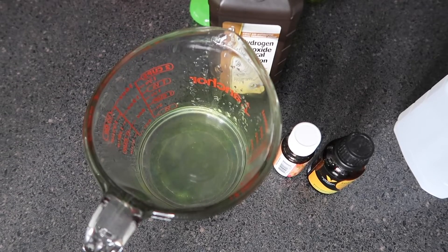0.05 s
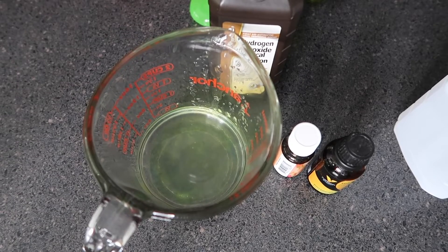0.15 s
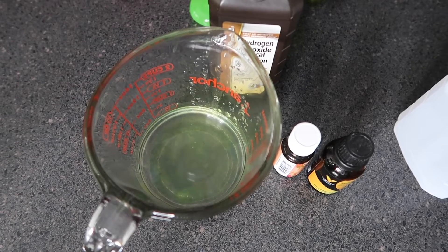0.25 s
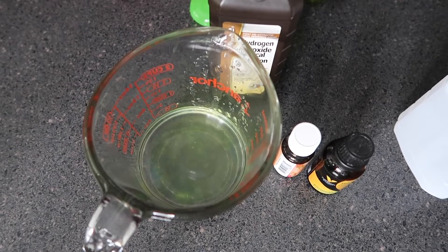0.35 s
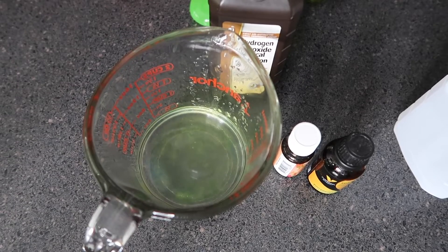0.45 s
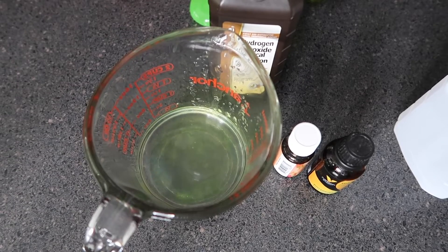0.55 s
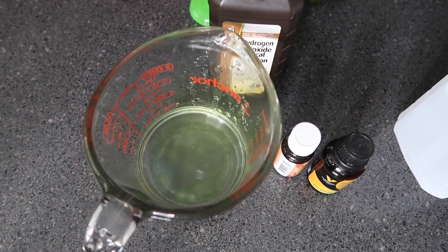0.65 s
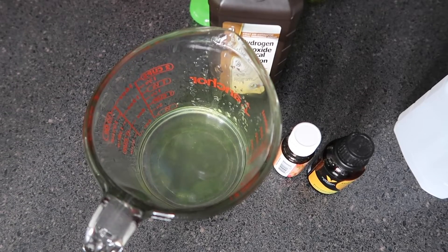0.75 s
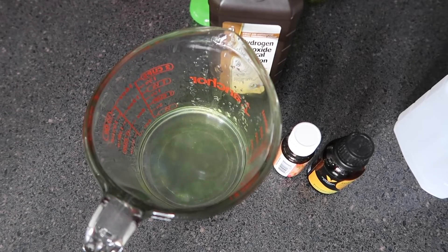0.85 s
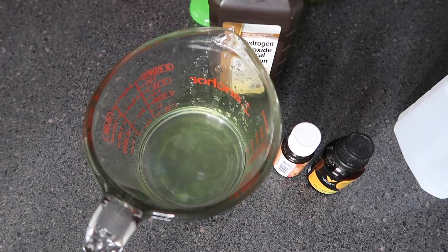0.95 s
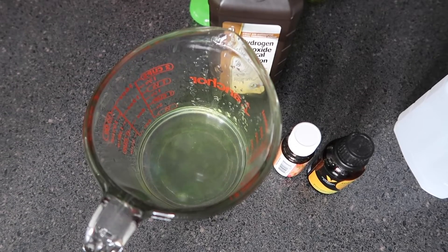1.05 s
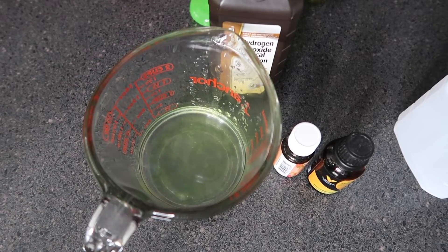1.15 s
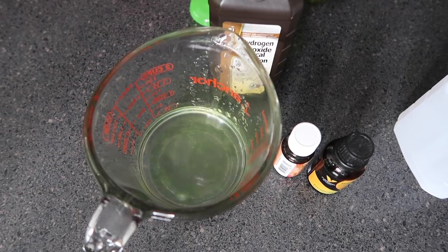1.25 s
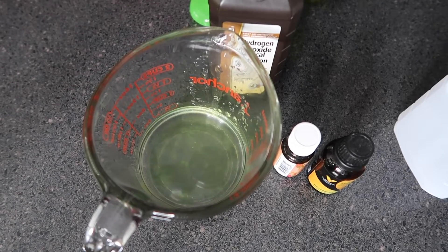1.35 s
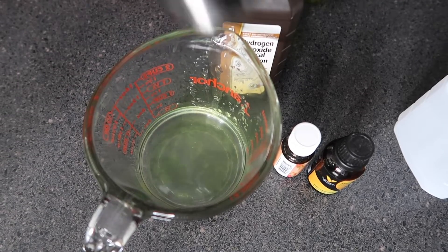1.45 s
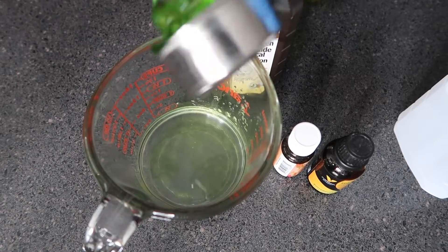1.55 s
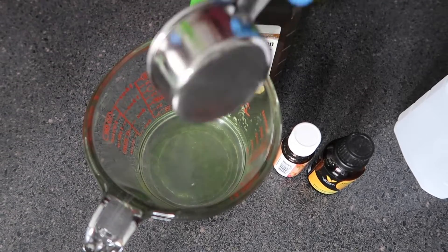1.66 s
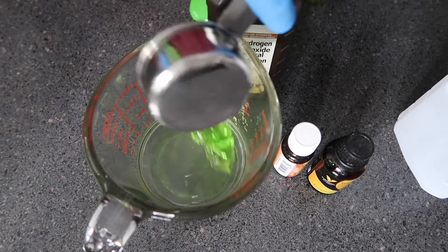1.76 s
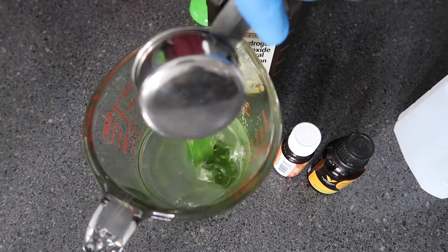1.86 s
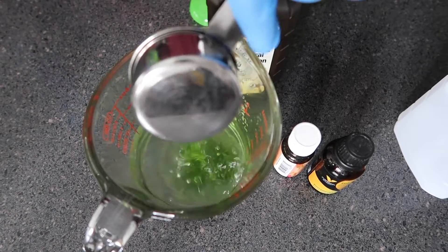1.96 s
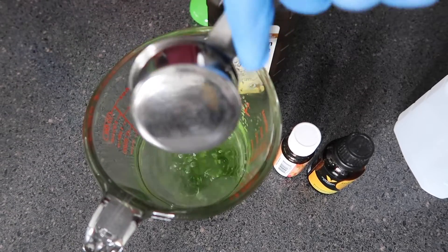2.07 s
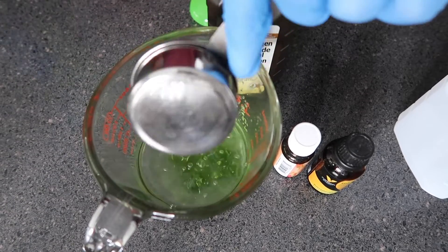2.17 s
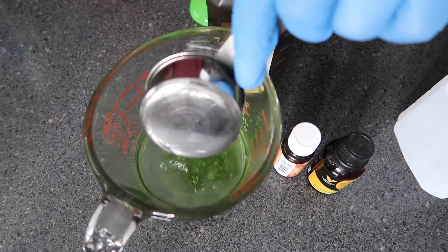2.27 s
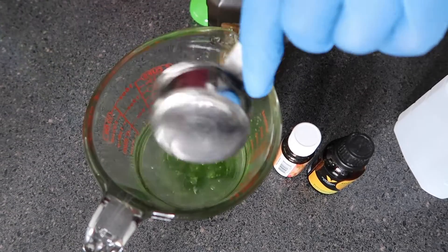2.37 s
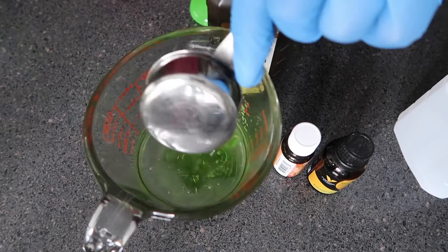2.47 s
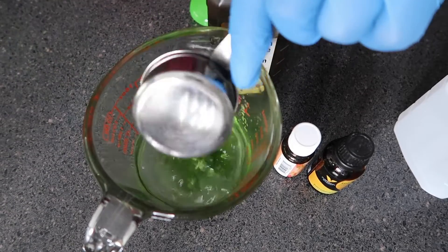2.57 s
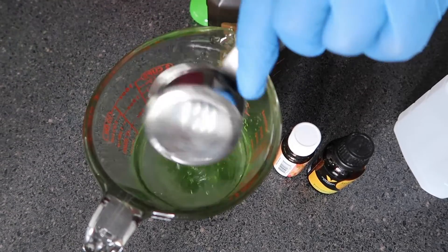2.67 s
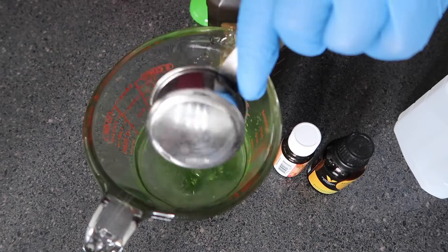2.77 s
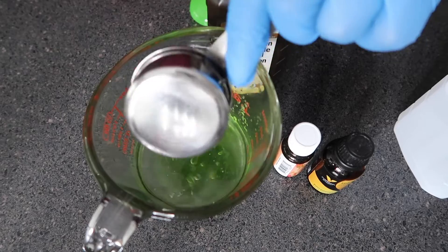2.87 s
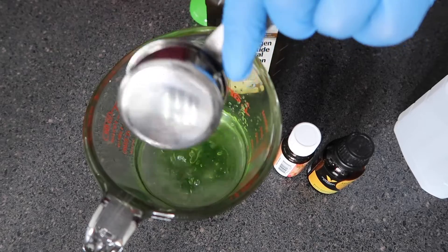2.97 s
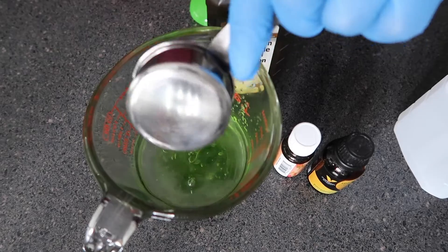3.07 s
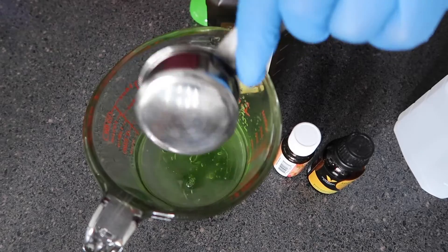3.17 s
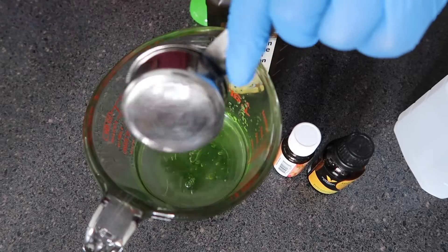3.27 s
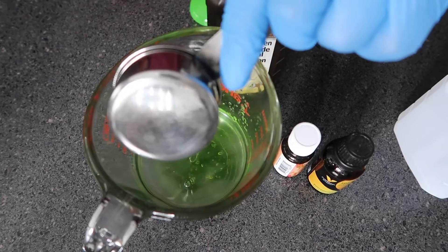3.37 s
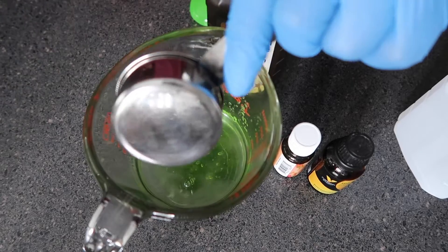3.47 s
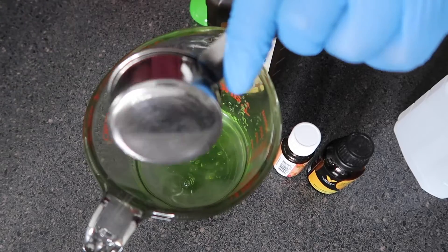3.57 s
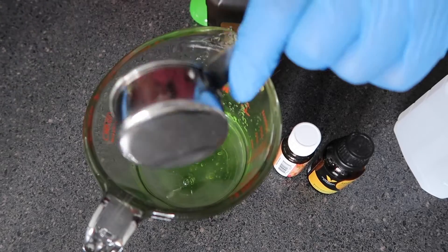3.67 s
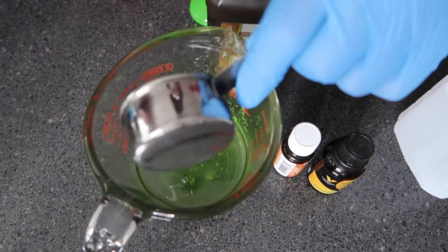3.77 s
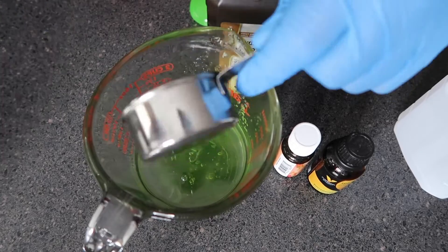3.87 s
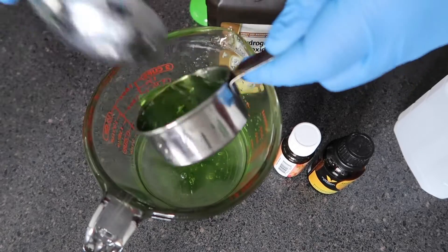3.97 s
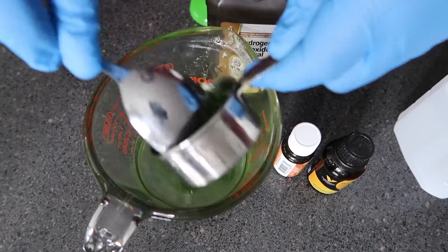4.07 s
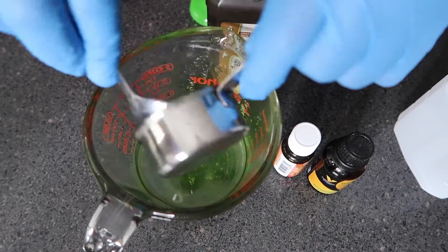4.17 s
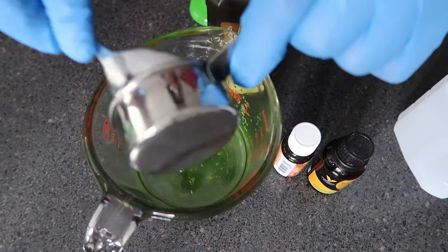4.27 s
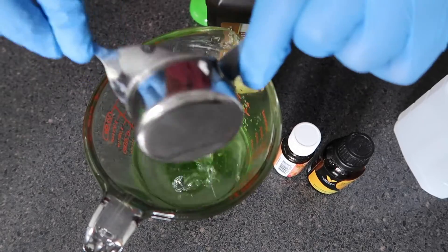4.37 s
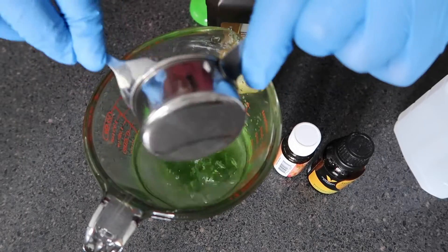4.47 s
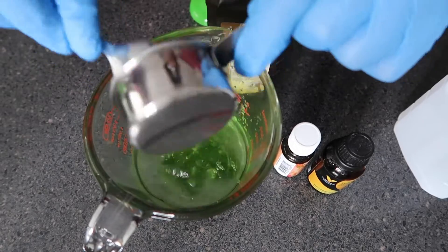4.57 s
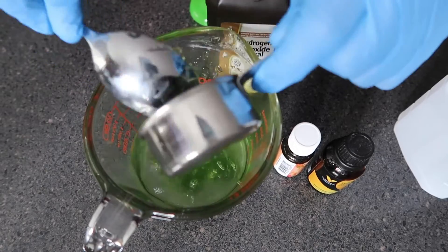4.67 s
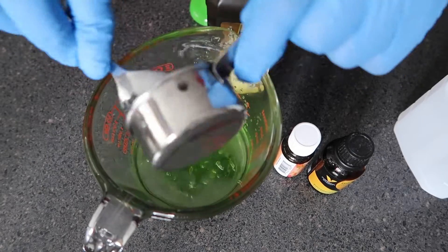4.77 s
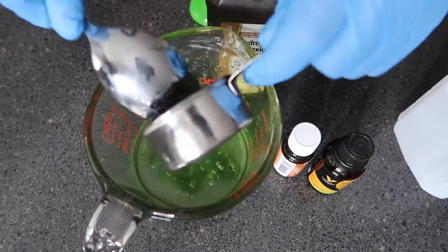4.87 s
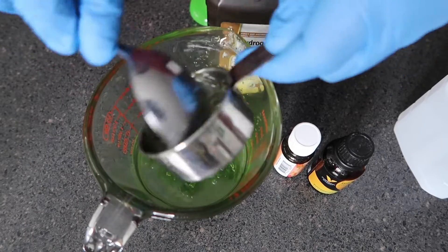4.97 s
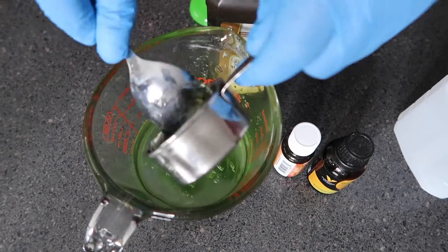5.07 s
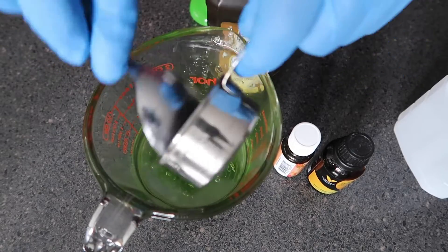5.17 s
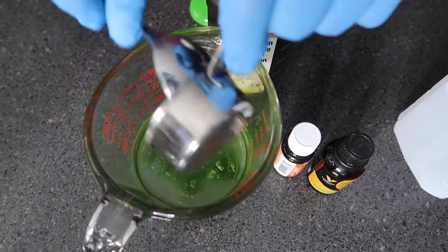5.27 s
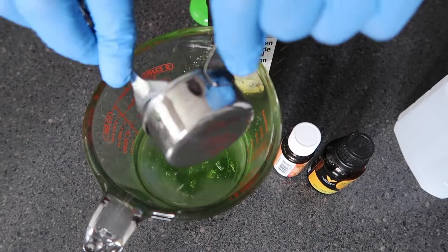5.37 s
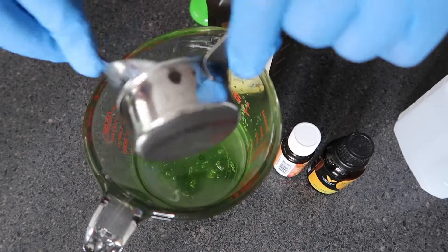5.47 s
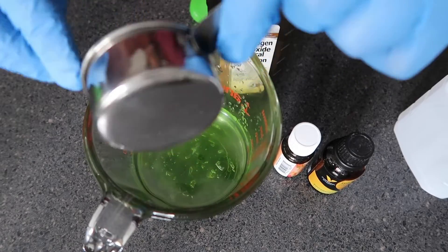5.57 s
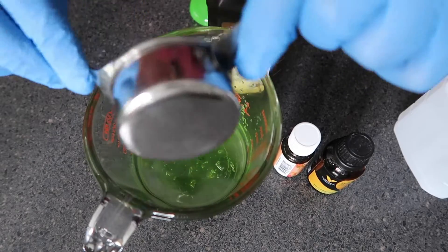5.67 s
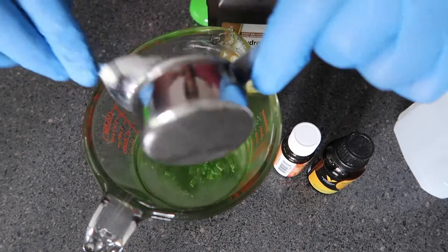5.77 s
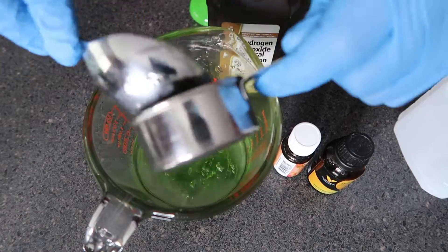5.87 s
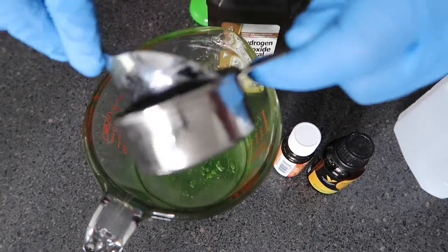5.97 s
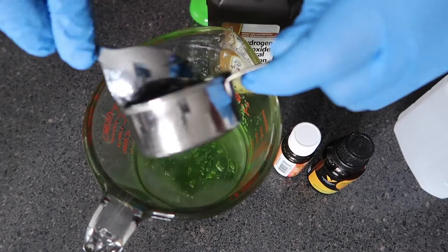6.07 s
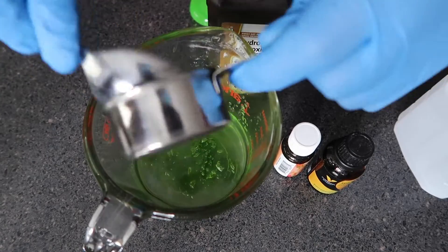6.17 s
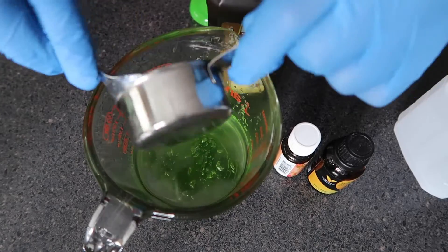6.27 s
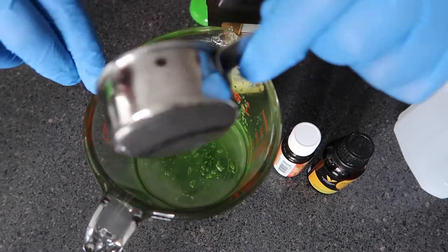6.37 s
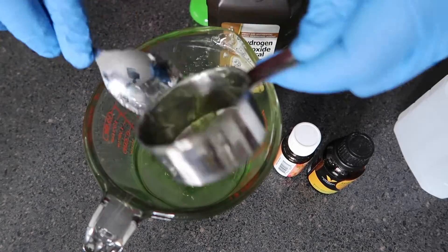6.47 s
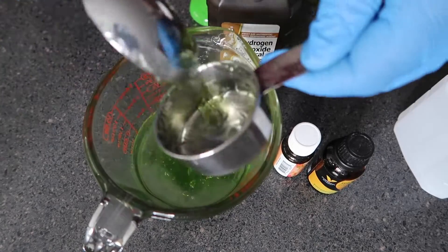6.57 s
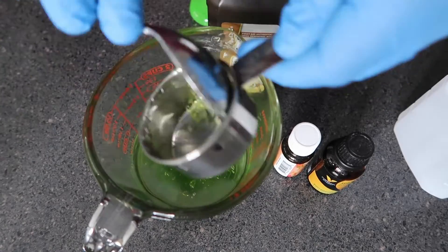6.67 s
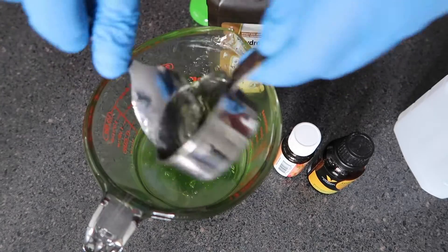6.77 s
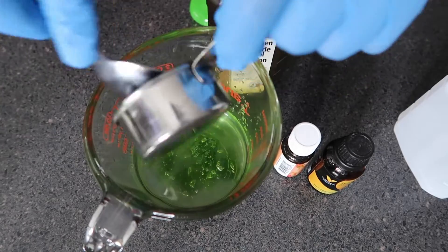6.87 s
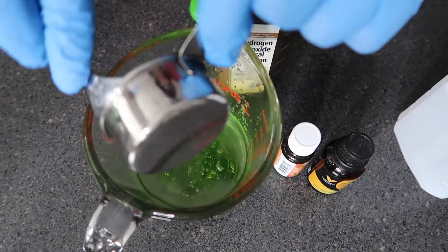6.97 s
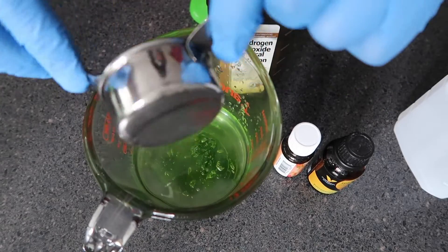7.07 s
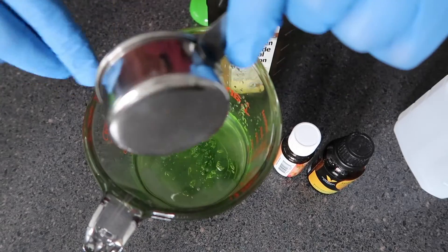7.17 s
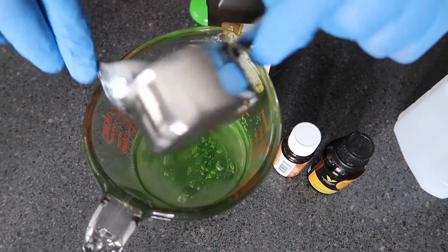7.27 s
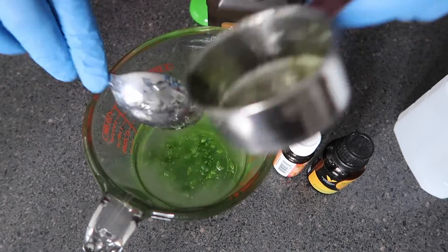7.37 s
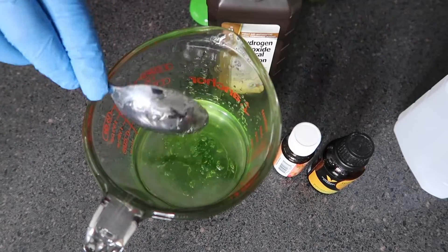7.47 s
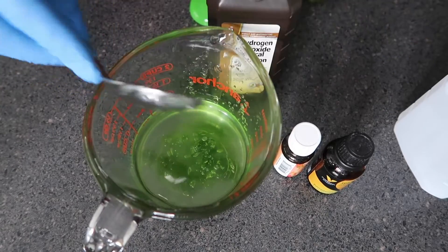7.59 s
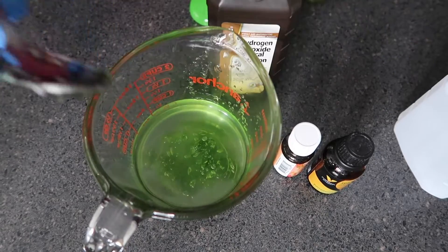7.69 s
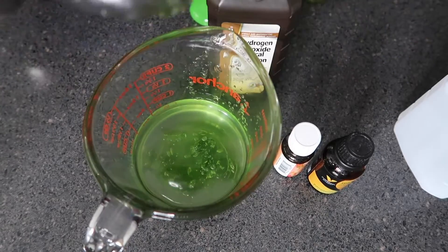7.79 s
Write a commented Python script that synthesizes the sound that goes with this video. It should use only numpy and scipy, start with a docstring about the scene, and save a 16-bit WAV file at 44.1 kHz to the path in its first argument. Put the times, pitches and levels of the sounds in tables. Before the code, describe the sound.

Close kitchen sounds: a low rumble, wet hollow plops, soft counter knocks, sharp damped steel clinks and raspy scraping, ending with bright taps on glass.

```python
"""Gel poured from a steel cup into a glass jug

Thick gel slides and plops into the jug: gliding sines sound its hollow, coloured noise ticks.
A spoon is picked up, clinks and scrapes around the wet cup (damped modes, stick-slip noise),
then is tapped on the jug's rim, where glass, steel and counter modes ring together.
A low rumble gives way to a thin hush; the close microphone in a small room overloads on the
hardest clinks."""
import sys
import numpy as np
from scipy import signal
from scipy.fft import rfft, irfft, next_fast_len
from scipy.io import wavfile
from scipy.ndimage import uniform_filter1d, map_coordinates

SR = 44100
rng = np.random.default_rng(int(sys.argv[2]) if len(sys.argv) > 2 else 0)


def to_wav(s):
    """Save 16-bit WAV."""
    ch = np.atleast_2d(s).T  # columns
    pcm = np.round(np.clip(ch, -1, 1) * 32767)  # PCM
    wavfile.write(sys.argv[1], SR, pcm.astype(np.int16))


N = 345290
T = np.arange(SR // 3) / SR  # time within one blow [s]
WALL_HZ = 5120  # strongest ring in the middle of the cup wall


def amp(db):
    """Decibels to gain."""
    return 10 ** (np.asarray(db) / 20)


def unit(x):
    """Scale to rms 1."""
    return x / np.sqrt(np.mean(x ** 2) + 1e-20)


def along(points, hz):
    """Interpolate (frequency, value) points on a log-frequency axis."""
    f, v = np.transpose(points)
    return np.interp(np.log(hz + 1), np.log(f + 1), v)


def filtered(x, response):
    """Multiply the spectrum of x by a response of frequency."""
    n = x.shape[-1]
    m = next_fast_len(n + SR // 4)
    return irfft(rfft(x, m) * response(np.fft.rfftfreq(m, 1 / SR)), m)[..., :n]


def noise(spectrum, size):
    """Coloured noise of rms 1."""
    return unit(filtered(rng.standard_normal(size), lambda hz: amp(along(spectrum, hz))))


def add(track, s, sound):
    """Mix a sound into the track at s seconds."""
    part = track[round(s * SR):][:len(sound)]
    part += sound[:len(part)]


def fade(t60):
    """Exponential decay by 60 dB in t60 seconds."""
    return np.exp(-np.log(1000) * T / t60)


def wobble(rate):
    """Smooth random curve over one blow, rate knots a second."""
    return map_coordinates(rng.standard_normal(int(rate) + 2), [T * rate])


def ring(modes, scatter_db, colour=lambda hz: 0):
    """Struck modes decay as sines, each at a new strength and with a wavering phase."""
    out = 0
    for hz, db, t60 in modes:
        phase_cycles = rng.random() + .07 * np.sqrt(hz / WALL_HZ) * wobble(170)
        level = amp(db + colour(hz) + scatter_db * rng.normal())
        out = out + level * fade(t60) * np.sin(2 * np.pi * (hz * T + phase_cycles))
    return out


def resonances(peaks, hz):
    """Response of (frequency, width, level) resonances in alternating polarity."""
    total = 0
    for k, (c, w, db) in enumerate(peaks):
        total = total + (-1) ** k * amp(db) * 1j * hz * w / (c * c - hz * hz + 1j * hz * w)
    return total


def focus(hz, centre_hz, octaves):
    """Bell on the log-frequency axis: the contact point favours some modes."""
    return np.exp(-(np.log2((hz + 1) / centre_hz) / octaves) ** 2)


def above(x, hz):
    """High-pass: small things radiate no bass."""
    return signal.sosfilt(signal.butter(2, hz, "high", fs=SR, output="sos"), x)


def patchy(x, depth_db, size=256):
    """Each small patch of time and frequency gets its own strength."""
    z = signal.stft(x, nperseg=size)[2]
    field = uniform_filter1d(rng.standard_normal(z.shape), 4, axis=0)
    field = uniform_filter1d(field, 4, axis=1)
    return signal.istft(z * amp(depth_db * unit(field)), nperseg=size)[1][:len(x)]


# spectrum of the first rumble: (frequency [Hz], level [dB])
RUMBLE_SPECTRUM = [(15, -46.5), (25, -9.5), (126, 5), (313, -11.5), (700, -25.5), (3720, -35), (13200, -51),
                   (15500, -61)]
# spectrum of the later hush: (frequency [Hz], level [dB])
HUSH_SPECTRUM = [(24, -53), (55, -18), (120, -6), (266, -5.5), (1600, -25), (15500, -36.5)]
# hush over time, before hush_db: (time [s], level [dB])
HUSH_LEVEL = [(3.7, -52), (4.83, -55), (5.86, -62), (6.64, -55), (7.26, -61.5), (7.49, -50.5), (7.83, -57)]
# side channel, alike at both ports only in the bass: (frequency [Hz], level [dB])
FLOOR_WIDTH = [(90, -35.5), (250, -14), (600, -2.5)]
RUMBLE_DB, RUMBLE_END_S, RUMBLE_FADE_S = -41, 3.655, 0.014
WHINE_HZ, WHINE_DB = 13006, -83


def background(hush_db=1):
    """Steady low noise and a faint electric whine give way abruptly to a thinner, wavering hush."""
    t = np.arange(N) / SR
    stopped = (1 + np.tanh((t - RUMBLE_END_S) / RUMBLE_FADE_S)) / 2
    rumble = amp(RUMBLE_DB) * (1 - stopped) * noise(RUMBLE_SPECTRUM, (2, N))
    hush_gain = amp(hush_db + np.interp(t, *np.transpose(HUSH_LEVEL)))
    hush = hush_gain * stopped * noise(HUSH_SPECTRUM, (2, N))
    mid, side = rumble + hush
    mid = mid + amp(WHINE_DB) * (1 - stopped) * np.sin(2 * np.pi * WHINE_HZ * t)
    side = filtered(side, lambda hz: amp(along(FLOOR_WIDTH, hz)))
    return mid + np.array([side, -side])


# soft knocks: (time [s], push level [dB], push frequency [Hz], counter level [dB])
BUMPS = [(0.145, -12, 200, -58), (0.888, -3, 140, -42), (2.772, -7.5, 168, -29.5), (2.982, -13.5, 194, -23),
         (3.087, -25, 172, -41), (5.374, -29.5, 118, -49.5), (6.7515, -32, 90, -58)]
# counter modes: (frequency [Hz], level [dB], t60 [s])
WORKTOP_MODES = [(315, -2.5, 0.11), (576, 4, 0.065), (1765, 4, 0.011)]
BUMP_CYCLES = 3.57  # t60 of the push in cycles


def handling(grain_db=-12, grain_t60_s=0.29):
    """Dull bumps: a low push of a few cycles and the knock of the counter."""
    out = np.zeros(N)
    for s, db, hz, knock_db in BUMPS:
        add(out, s, amp(db) * fade(BUMP_CYCLES / hz) * np.sin(2 * np.pi * hz * T))
        grain = amp(grain_db) * noise([(1700, 7), (6000, -32)], len(T)) * fade(grain_t60_s)
        add(out, s, amp(knock_db) * (ring(WORKTOP_MODES, 2) + grain) * (1 - fade(.005)))
    return above(out, 58)


# air pockets in the gel, and the short 2.2 kHz ring of an early knock:
# (time [s], level [dB], starting pitch [Hz], swell [s])
PLOPS = [(0.89, -21, 2175, 0.00019), (1.927, -20, 3240, 0.0033), (1.934, -5, 880, 0.0035),
         (1.946, -11.5, 1153, 0.00057), (1.996, -10, 2230, 0.00016), (2.081, -24, 2030, 0.001),
         (4.441, -23, 2100, 0.00067)]
# jug modes under the lump: (frequency [Hz], level [dB], t60 [s])
LUMP_MODES = [(414.5, -16.5, 0.11), (2500, -30, 0.11)]
# small ticks, one of them on that knock, before tick_db: (time [s], level [dB])
TICKS = [(0.842, -34.5), (.889, -29.5), (1.34, -37.5), (1.995, -21), (2.241, -29), (2.685, -33),
         (4.7074, -14)]
# spectrum of a tick: (frequency [Hz], level [dB])
TICK_SPECTRUM = [(300, -4), (2200, 6), (9000, -14.5), (15000, -24)]
# air in the jug: (frequency [Hz], width [Hz], level [dB])
HOLLOW = [(478, 18, -4), (928, 6.2, -4), (2400, 60, -6)]
PLOP_CYCLES, RISE_OCTAVES_PER_S = 23.7, 7.4  # t60 in cycles of the starting pitch
LUMP_S, LUMP_DB, LUMP_T60_S = 4.7088, -1.5, 0.039
LUMP_HZ, LUMP_DROP_OCTAVES, LUMP_SETTLE_S = 479, 1, 0.00098  # pitch falls as the cavity opens


def gel(hollow_db=-9, slither_db=-53, tick_db=-2.0):
    """Gel slithers, ticks and plops, an early knock rings, a lump drops; the jug's hollow answers."""
    out = np.zeros(N)
    for s, db, hz, swell_s in PLOPS:
        shape = (1 - np.exp(-(T / swell_s) ** 2)) * fade(PLOP_CYCLES / hz)
        pitch_hz = hz * 2 ** (RISE_OCTAVES_PER_S * np.minimum(T, .02))  # climbs for 20 ms
        plop = np.sin(2 * np.pi * np.cumsum(pitch_hz) / SR)
        add(out, s, amp(db) * shape / shape.max() * plop)
    pitch_hz = LUMP_HZ * 2 ** (LUMP_DROP_OCTAVES * np.exp(-T / LUMP_SETTLE_S))
    lump = fade(LUMP_T60_S) * np.sin(2 * np.pi * np.cumsum(pitch_hz) / SR)
    add(out, LUMP_S, amp(LUMP_DB) * lump)
    add(out, LUMP_S, ring(LUMP_MODES, 0.84))
    for s, db in TICKS:
        add(out, s, amp(db + tick_db) * noise(TICK_SPECTRUM, len(T)) * fade(0.031))
    slither = noise(TICK_SPECTRUM, len(T)) * np.exp(-((T - .09) / 0.058) ** 2)
    add(out, 1.6, amp(slither_db) * slither)
    return out + amp(hollow_db) * filtered(out, lambda hz: resonances(HOLLOW, hz))


def spatter(count=110, level_db=-39, hz=1800):
    """Tiny bubbles burst within 0.2 s, most densely at first, each rising in pitch."""
    out = np.zeros(N)
    for when, size, pitch in rng.random((count, 3)):
        start_hz = hz * 2 ** (1.4 * (pitch - .5))
        bubble = np.sin(2 * np.pi * start_hz * T * (1 + 4 * T)) * fade(.03) * (1 - fade(.01))
        add(out, 1.926 + 0.2 * when ** 2, amp(level_db + 12 * (size - when)) * bubble)
    return out


# spoon knocks on the counter: (time [s], level [dB])
PICKUP = [(3.7449, -14), (3.7808, -2), (3.865, -12)]
# free spoon modes: (frequency [Hz], level [dB], t60 [s])
SPOON_MODES = [(415, -22, .09), (1500, -16, .06), (1772, -21, .1), (2449, -21, .15), (4858, -25, .12),
               (5650, -15, .08), (5880, -8, .03), (6150, -9, .03), (6641, -15, .1), (6699, -12, .1),
               (8904, -22, .12), (10720, -22, .08), (13800, -21, .06)]
# spectrum of the counter being struck: (frequency [Hz], level [dB])
CLATTER_SPECTRUM = [(88, -56.5), (150, -20.5), (404, -12), (1550, -9.5), (1950, -13.5), (3800, -9.5),
                    (7130, -20), (15500, -32)]


def pickup(clatter_db=-18, drag_db=-30):
    """The spoon rings freely as it clatters and drags off the counter."""
    out = np.zeros(N)
    for s, db in PICKUP:
        clatter = noise(CLATTER_SPECTRUM, len(T)) * (fade(0.19) + 3.2 * fade(0.0061))
        add(out, s, amp(db) * (ring(SPOON_MODES, 0.19) + amp(clatter_db) * clatter))
    add(out, 3.868, amp(drag_db) * noise(CLATTER_SPECTRUM, len(T)) * fade(0.23))
    return out


HALF_EMPTY_S, MODE_RISE_PER_S = 5.7, .028  # rise as a share of the pitch


def emptied(modes, s):
    """Cup modes at s seconds: they rise as gel leaves and shift a little with each new grip."""
    moved = []
    for hz, db, t60 in modes:
        factor = 1 + MODE_RISE_PER_S * (s - HALF_EMPTY_S) + .012 * rng.normal()
        moved.append((hz * factor, db, t60))
    return moved


# spoon against cup; a bare edge sounds a wider band than a cushioned one:
# (time [s], level [dB], strongest ring [Hz], edge [dB])
CLINKS = [(4.1371, -4.5, 4150, -6), (4.157, -2, 4840, 3.5), (4.3283, 1.5, 3420, 4.5),
          (4.359, -8, 4200, 4.5), (4.4587, -12.5, 4860, -10.5), (4.5024, -1.5, 4670, -4),
          (4.642, -8, 4715, -5.5), (4.6735, -0.5, 5360, 10), (4.8202, -11, 4680, -2),
          (4.8427, -7.5, 4890, -2), (5.016, -15.5, 5070, 15), (5.032, -1.5, 4620, 8.5),
          (5.2237, -8.5, 5400, 8), (5.3805, 1, 4315, -5), (5.4372, -3.5, 4800, -8), (5.6026, -8.5, 7040, 7),
          (5.6457, 0.5, 7180, -6), (6.0111, -5, 7080, 0.5), (6.0477, -10, 5240, 6.5),
          (6.0858, -10.5, 4020, 4.5), (6.2403, -7, 7390, -6), (6.2683, -0.5, 5440, 5.5),
          (6.2979, -5, 6400, 4), (6.6335, -6, 4920, 2), (6.7498, 5, 4260, 5), (7.005, 3.5, 4804, 2),
          (7.0372, -4, 5960, -2.5)]
# gel-damped cup and spoon, half empty: (frequency [Hz], level [dB], t60 [s])
STEEL_MODES = [(1200, -16.5, 0.0064), (2090, -4, 0.006), (3420, -3, 0.0086), (3664, 7.5, 0.0031),
               (4062, 2, 0.0042), (4440, -1.5, 0.012), (5008, 3.5, 0.018), (5865, -5, 0.012),
               (6382, -7.5, 0.02), (7110, -1, 0.01), (9800, -14.5, 0.013), (11410, 3, 0.0044)]
# dry rim singing on, half empty: (frequency [Hz], level [dB], t60 [s])
AFTERRING_MODES = [(4100, -41, .16), (4950, -30, .13), (7400, -32, .14)]
# colour of a blow on the middle of the wall: (frequency [Hz], level [dB])
CLINK_TILT = [(2100, -2.5), (3300, 1), (5000, -5), (6400, 0), (7900, -7), (9600, -18.5)]
# spectrum of that blow's crack: (frequency [Hz], level [dB])
CRACK_SPECTRUM = [(150, -33), (900, -11), (3500, -1.5), (7000, 1), (12000, -6.5)]
# how much of the edge each band gets: (frequency [Hz], share [1])
EDGE_SHARE = [(2100, 0.9), (3300, 0.91), (4700, 0), (7000, 0), (10000, .4)]


def clinks(level_db=0, main_db=6, main_t60_s=0.01, crack_db=-5, crack_t60_s=0.011):
    """Steel meets steel for a few ms; gel and fingers choke the ring at once."""
    out = np.zeros(N)
    contact = 1 - np.exp(-T / .0008)
    for s, db, main_hz, edge_db in CLINKS:
        tilt = lambda hz: along(CLINK_TILT, hz) + edge_db * along(EDGE_SHARE, hz)
        colour = lambda hz: tilt(hz) + 6 * (focus(hz, main_hz, .25) - .5)
        body = ring(emptied(STEEL_MODES, s) + [(main_hz, main_db, main_t60_s)], 2, colour)
        spectrum = [(hz, level + edge_db * along(EDGE_SHARE, hz)) for hz, level in CRACK_SPECTRUM]
        crack = noise(spectrum, len(T)) * fade(crack_t60_s)
        blow = (body + amp(crack_db) * crack) * contact
        afterring = ring(emptied(AFTERRING_MODES, s), 3, lambda hz: tilt(hz) / 2)
        add(out, s, amp(db + level_db) * (blow / np.abs(blow).max() + afterring))
    return out


# colour of the rubbing: (frequency [Hz], level [dB])
RUB_COLOUR = [(1000, -12.5), (3000, -3.5), (9500, 0), (11500, -19.5), (15500, -8.5)]
SLIPS_PER_S = 500  # wet stick-slip
ARCH_OCTAVES, ARCH_S, WANDER_OCTAVES = 0.12, 0.032, .03  # pitch follows the pressure


def rasp(s, centre_hz, focus_db=9, octaves=0.45, sing_db=3, smear=0.2):
    """Slips excite the wall, detuned by the spoon; the contact sings, most near the wall's ring."""
    wall = []
    for hz, db, t60 in emptied(STEEL_MODES, s):
        width_hz = 2 * np.log(1000) / np.pi / t60
        wall.append((hz * (1 + .06 * rng.normal()), width_hz, db))
    strength = amp(6 * np.clip(rng.standard_normal(len(T)), -2, 2))
    catches = (rng.random(len(T)) < SLIPS_PER_S / SR) * strength
    slips = catches + smear * rng.standard_normal(len(T))
    colour = lambda hz: amp(focus_db * focus(hz, centre_hz, octaves) + along(RUB_COLOUR, hz))
    grit = filtered(slips, lambda hz: resonances(wall, hz) * colour(hz))
    arch = ARCH_OCTAVES * (np.exp(-((T - T.mean()) / ARCH_S) ** 2) - 1)
    pitch_hz = centre_hz * 2 ** (arch + WANDER_OCTAVES * wobble(70))
    waver = 1 + .5 * wobble(350) + .5j * wobble(350)  # level and phase
    tone = np.real(waver * np.exp(2j * np.pi * np.cumsum(pitch_hz) / SR))
    sing = amp(sing_db + 10 * (focus(centre_hz, WALL_HZ, .15) - 1))
    return unit(unit(patchy(grit, 5)) + sing * unit(tone))


# drags along the wet wall: (landing time [s], leaving time [s])
SCOOPS = [(4.159, 4.3), (4.33, 4.58), (4.845, 4.93), (5.034, 5.18), (5.224, 5.37), (5.385, 5.57),
          (6.05, 6.21), (6.271, 6.42), (6.754, 6.98), (7.008, 7.16)]
# spoon bearing on bare steel: (middle time [s], Gaussian sigma [s], level [dB], pitch [Hz])
RASPS = [(4.221, 0.0062, -21.5, 4600), (4.433, 0.0065, -36, 6200), (4.498, 0.014, -30.5, 4700),
         (4.56, 0.013, -29, 4850), (4.918, 0.0082, -29.5, 4500), (5.107, 0.011, -31.5, 5200),
         (5.286, 0.0056, -27.5, 4400), (5.336, .013, -31.5, 4300), (5.433, 0.0093, -26, 5300),
         (5.552, 0.0087, -37.5, 7100), (5.754, 0.021, -40, 3450), (6.392, 0.015, -32, 3900),
         (6.82, 0.015, -34.5, 5400), (6.958, 0.015, -37, 4400), (7.193, 0.017, -34, 3450)]
BITE_S, EASE_DB_PER_S = .015, 37.5  # the spoon bears down, then the hand eases off


def scrapes(drag_db=-41.0):
    """The spoon drags lightly through each scoop and rasps wherever it bears on bare steel."""
    out = np.zeros(N)
    for start, end in SCOOPS:
        pressure = np.clip(np.minimum(T, end - start - T) / BITE_S, 0, 1)
        drag = amp(drag_db - EASE_DB_PER_S * T) * pressure
        add(out, start, drag * rasp(start, WALL_HZ, sing_db=-5.5))
    for s, sigma_s, db, hz in RASPS:
        swell = np.exp(-((T - T.mean()) / sigma_s) ** 2 / 2)
        add(out, s - T.mean(), amp(db) * swell * rasp(s, hz))
    return out


# light ticks of the spoon's edge: (time [s], level [dB])
EDGE_TICKS = [(4.254, -19), (4.379, -22), (5.219, -9), (5.353, -13.5), (5.447, -12.5), (5.517, -23),
              (5.8014, -23), (6.321, -17.5), (6.423, -21), (6.742, -13), (7.225, -25), (7.718, -22)]


def edge_ticks(rim_db=8, tick_t60_s=0.015):
    """The edge touches or slips with a dry tick and leaves the rim faintly ringing."""
    out = np.zeros(N)
    for s, db in EDGE_TICKS:
        tick = rasp(s, WALL_HZ, sing_db=-20, focus_db=2) * fade(tick_t60_s)
        rim = amp(rim_db) * ring(emptied(AFTERRING_MODES, s), 2)
        add(out, s, amp(db) * (tick / np.abs(tick).max() + rim))
    return out


# cup struck on its dry outside: (frequency [Hz], level [dB], t60 [s])
CUP_MODES = [(3480, -8, .025), (3745, -21, .3), (4400, -8, .014), (7140, -16, .12), (7945, -12, .1),
             (9220, -16, .08)]
# spoon struck on its neck: (frequency [Hz], level [dB], t60 [s])
NECK_MODES = [(6700, -9, .014), (8904, -22, .1), (11720, -15, .12), (13930, -14, .09)]
# jug glass: (frequency [Hz], level [dB], t60 [s])
GLASS_MODES = [(2765, -19, .18), (2813, -15, .25), (7945, -19, .11)]
# jug rocking on the counter: (frequency [Hz], level [dB], t60 [s])
BASE_MODES = [(245, -4, 0.16), (314, -6, 0.15), (401, -1, 0.14), (577, -3.5, 0.097), (963, -6, 0.12),
              (1750, 0.5, 0.018)]
CUP_TAP_S = 7.347
SPOON_TAP_S, TAP_GAP_S, TAP_LOSS_DB = 7.487, .068, 0.5  # even rhythm; loss per tap, jug only


def taps(cup_db=-3.5, spoon_db=-9, jug_db=-8.5, thud_db=-21, crack_db=-6,
         rock_db=-4, rock_s=0.013, count=3):
    """Cup, then spoon, on the jug's rim: both ring; the jug thuds and rocks once on the counter."""
    out = np.zeros(N)
    blows = [(CUP_TAP_S, -2.5, amp(cup_db) * ring(CUP_MODES, 1.0))]
    for k in range(count):
        steel = amp(spoon_db) * ring(NECK_MODES, 0.39)
        blows.append((SPOON_TAP_S + k * TAP_GAP_S, -k * TAP_LOSS_DB, steel))
    for s, db, steel in blows:
        crack = amp(crack_db) * noise(TICK_SPECTRUM, len(T)) * fade(.025)
        jug = amp(db + jug_db) * (ring(GLASS_MODES, 1) + crack)
        thud = amp(db + thud_db) * ring(BASE_MODES, 2)
        add(out, s, steel + jug + thud)
        rock = noise(CLATTER_SPECTRUM, len(T)) * fade(0.13)
        add(out, s + rock_s, amp(db + thud_db + rock_db) * rock)
    return above(out, 100.0)


# room decay: (frequency [Hz], t60 [s])
KITCHEN_T60 = [(150, 0.32), (4000, 0.32), (14000, 0.018)]


def kitchen(x, early_db=-19, early_t60_s=0.1, tail_db=-24):
    """Quick reflections from jug and counter plus the room's faint tail, as decaying noise."""
    hz, t, z = signal.stft(rng.standard_normal(len(T)), SR, nperseg=256)
    decay = amp(-60 * t / along(KITCHEN_T60, hz)[:, None])
    tail = signal.istft(z * decay, SR, nperseg=256)[1][:len(T)]
    early = rng.standard_normal(len(T)) * fade(early_t60_s)
    answer = amp(early_db) * early / np.linalg.norm(early)
    answer = answer + amp(tail_db) * tail / np.linalg.norm(tail)
    return signal.fftconvolve(x, np.pad(answer, (SR // 400, 0)))[:N]  # 2.5 ms later


# side channel of a source, before its own width: (frequency [Hz], level [dB])
WIDTH = [(2500, -39.5), (4800, -25.5), (8000, -7.5), (13000, -4.5)]


def scene(diffuse_db=-9, cup_width_db=-4, jug_width_db=3, spoon_width_db=11):
    """Two close microphone ports hear the same bass; the treble differs more for things off side."""
    cup = clinks() + scrapes() + edge_ticks()
    jug = taps() + above(gel() + spatter(), 290) + handling()
    spoon = pickup()
    direct = cup + jug + spoon
    mid = direct + kitchen(direct)
    side = amp(diffuse_db) * kitchen(direct)
    for sound, width_db in (cup, cup_width_db), (jug, jug_width_db), (spoon, spoon_width_db):
        side += filtered(sound, lambda hz: 1j * amp(np.minimum(along(WIDTH, hz) + width_db, 0)))
    balance = amp([[.2], [-.2]])
    return np.array([mid + side, mid - side]) * balance + background()


TOP_HZ = 15800


def record(dry):
    """The loudest peaks flatten towards full scale; a steep low-pass then sets the band limit."""
    clipped = dry / (1 + np.abs(dry) ** 8) ** (1 / 8)
    return filtered(clipped, lambda hz: 1 / (1 + (hz / TOP_HZ) ** 120))


dry = scene()
out = record(dry)
to_wav(out)
```